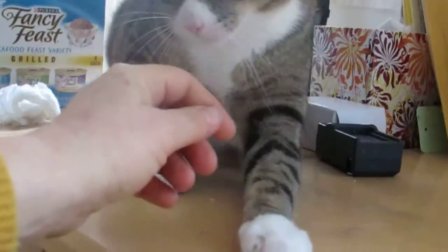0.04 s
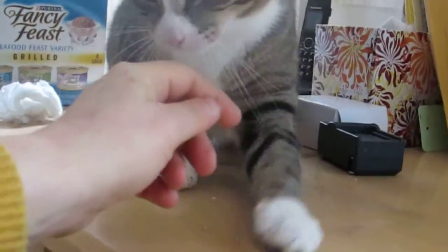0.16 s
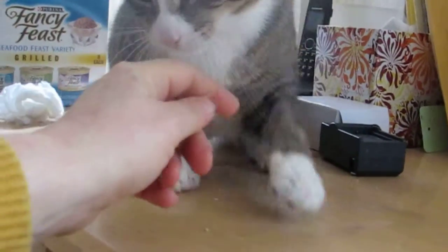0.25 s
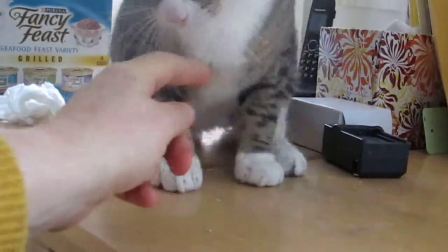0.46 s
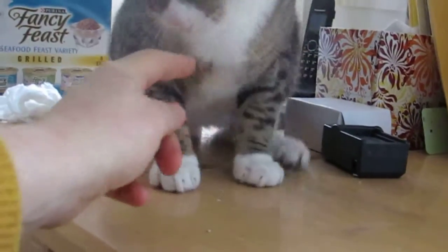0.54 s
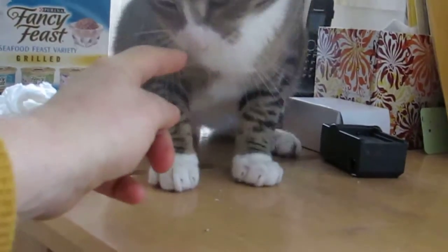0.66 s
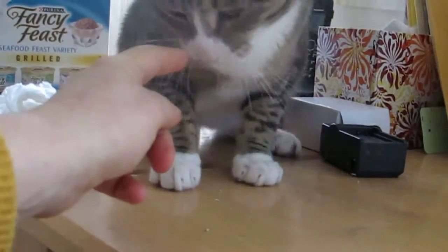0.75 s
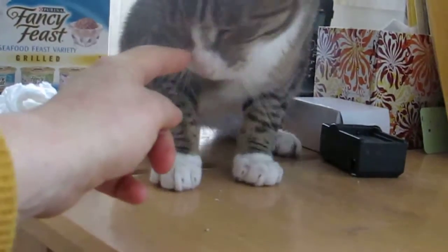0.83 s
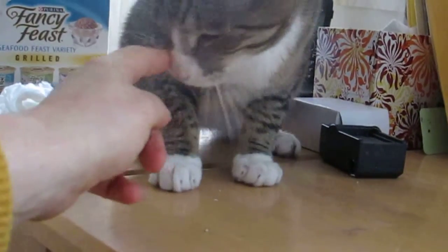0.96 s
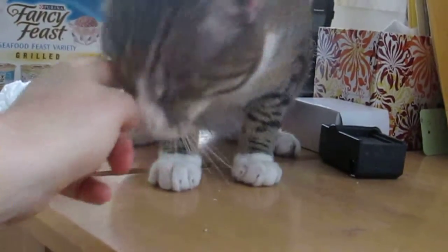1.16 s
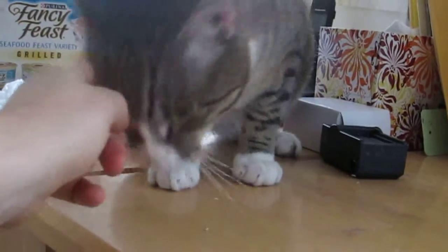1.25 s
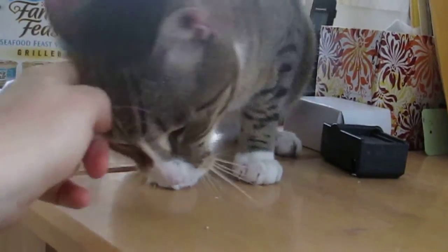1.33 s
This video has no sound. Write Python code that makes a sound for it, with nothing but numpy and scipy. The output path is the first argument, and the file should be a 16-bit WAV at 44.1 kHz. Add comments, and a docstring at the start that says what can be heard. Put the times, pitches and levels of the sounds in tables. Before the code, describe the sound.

In a quiet room, three crisp little clicks sound close by, with faint ticks just before them. Soft thuds follow, probably a cat's paw set down on a wooden table, over a steady low hiss.

```python
"""Three short, close clicks sound in a quiet room where a cat stands on a wooden table.
Each click is a few sharp snaps (heavily damped modes), a fine crackle of tiny snaps between them
and a hollow pop that falls in pitch. Two faint ticks come first. After the last click, soft thuds
(probably a paw set down) excite the table's low modes. The room adds a short reverberation,
and it hisses over a low rumble throughout."""
import sys
import numpy as np
from scipy import signal
from scipy.fft import rfft, irfft, next_fast_len
from scipy.io import wavfile

SR = 44100
rng = np.random.default_rng(int(sys.argv[2]) if len(sys.argv) > 2 else 0)


def put_to_file(sound):
    """Save the sound as 16-bit audio at rate SR, in the file named by the first command-line argument."""
    columns = np.atleast_2d(sound).T  # one column per channel
    safe = np.clip(columns, -1, 1)
    whole_steps = np.round(safe * 32767)
    wavfile.write(sys.argv[1], SR, whole_steps.astype(np.int16))


N = 61739

# The three clicks, the last in two parts. Each row: start and length in seconds,
# crackle and pop levels in dB, the pop's first and last frequency in Hz.
CLICK_PARTS = [(.2050, 0.0085, -42, -52, 670, 498), (0.3621, 0.014, -50.5, -38.5, 791, 431),
               (0.5279, 0.0107, -40, -35.5, 701, 402), (.5384, .0070, -44.5, -39.5, 645, 490)]


def amp(db):
    """Amplitude ratio of a level in decibels."""
    return 10 ** (np.asarray(db) / 20)


def unit(x):
    """Normalisation to an rms of 1."""
    return x / np.sqrt(np.mean(x ** 2) + 1e-20)


def along(points, hz):
    """Interpolation of (Hz, value) points on a logarithmic frequency axis."""
    frequencies, values = np.transpose(points)
    return np.interp(np.log(hz + 1), np.log(frequencies + 1), values)


def filtered(x, response):
    """Linear filtering: the spectrum of x is multiplied by response(hz)."""
    size = next_fast_len(N + SR // 2)
    return irfft(rfft(x, size) * response(np.fft.rfftfreq(size, 1 / SR)), size)[..., :N]


def pan(right_db):
    """Interaural level difference: left and right gains, right_db apart."""
    return amp(np.array([[-right_db], [right_db]]) / 2)


def add(out, start, sound):
    """Superposition: a sound joins the mix at start, in seconds."""
    part = out[:, max(0, round(start * SR)):][:, :sound.shape[-1]]
    part += sound[..., :part.shape[1]]


def stereo_noise(spectrum, coherence):
    """Partial coherence: the balance of independent mid and side noises sets how alike the ears are."""
    def response(hz):
        angle = np.arccos(along(coherence, hz)) / 2
        return amp(along(spectrum, hz)) * [np.cos(angle), np.sin(angle)]
    mid, side = filtered(rng.standard_normal((2, N)), response)
    return unit(np.array([mid + side, mid - side]))


def background():
    """Stationary noise: a broad, diffuse hiss lies over a largely coherent room rumble."""
    # Noise spectra. Each row: frequency in Hz, relative spectral density in dB.
    hiss_spectrum = [(120, -16.5), (200, -8.5), (268, -4), (360, -6.5), (409, -4.5), (612, -7.5),
                     (1230, -6.5), (1810, -8), (7830, -12.5), (8580, -13.5), (16000, -20)]
    rumble_spectrum = [(20, -10.5), (55, -4), (85, -10), (115, 1.5), (145, 3), (180, -10), (260, -10),
                       (400, -25), (800, -65)]
    # Likeness of the hiss at the two ears. Each row: frequency in Hz, correlation.
    hiss_coherence = [(200, 0.59), (600, 0.36), (1500, 0.18), (4000, 0.2), (12000, 0.039)]
    rumble = stereo_noise(rumble_spectrum, coherence=[(100, 0.85)]) * pan(right_db=4.5)
    hiss = stereo_noise(hiss_spectrum, hiss_coherence)
    return amp(-61) * hiss + amp(-73.5) * rumble


def snap(pitch, low_db, treble_db):
    """Impulse response: heavily damped modes interfere with their reflection from a close surface."""
    # The snap's modes. Each row: frequency in Hz, T60 in seconds, left and right levels in dB.
    modes = [(2260, 0.0024, -26, -20), (3030, 0.0021, -12, -10.5), (5160, 0.0026, -1.5, -5),
             (5650, 0.0028, -12.5, -7), (6760, 0.0043, -30, -6), (9120, 0.0024, -28, -12)]
    reflection_s, reflection_db = 0.00038, -9
    dip_hz, dip_width_hz, dip_depth = 4080, 370, 0.66
    bottom_hz, left_top_hz, right_top_hz = 1020, 7140, 11000
    t = np.arange(SR // 100) / SR
    paths = [(t, 0), (np.maximum(t - reflection_s, 0), reflection_db)]
    ring = np.zeros((2, len(t)))
    for hz, t60, left_db, right_db in modes:
        tilt_db = low_db * (hz < 4000) + treble_db * (hz > 6500)
        mode_db = np.array([[left_db], [right_db]]) + tilt_db
        for age, path_db in paths:
            ring += amp(mode_db + path_db - 60 * age / t60) * np.sin(2 * np.pi * hz * pitch * age)
    # A notch deepens the valley between the two main resonances.
    dip_band = signal.iirpeak(dip_hz * pitch, dip_hz / dip_width_hz, fs=SR)
    ring -= dip_depth * signal.lfilter(*dip_band, ring)
    for side, top_hz in enumerate([left_top_hz, right_top_hz]):
        passband = signal.butter(2, [bottom_hz, top_hz], "bandpass", fs=SR)
        ring[side] = signal.lfilter(*passband, ring[side])
    return ring


def snaps():
    """Impulsive excitation: single snaps form the faint ticks, then the sharp edges of the clicks."""
    # The snaps. Each row: start in seconds, gain in dB, pitch ratio,
    # extra gain of the low modes and of the treble modes in dB.
    impulses = [(.0300, -43, 0.73, -11, -8.5), (0.0468, -39, 0.75, -14, -9), (0.0485, -43, 0.83, 3, -6),
                (.2041, -20, 1.02, -17, 5), (.2060, -26.5, 1.06, -3, 3), (.2126, -17, 1.044, 0, -2.5),
                (0.2165, -35, 1.1, -6, -5), (0.3628, -27.5, 1.01, 5, 3), (.3762, -25.5, 0.85, 0.5, -3.5),
                (.5279, -20, 0.99, 6, 1), (0.5316, -30.5, 0.9, 11, -4), (0.5382, -19, 0.965, -0.5, -3),
                (.5448, -21, 0.89, 2, -3)]
    out = np.zeros((2, N))
    for start, db, pitch, low_db, treble_db in impulses:
        add(out, start, amp(db) * snap(pitch, low_db, treble_db))
    return out


def crackle():
    """Shot noise: a fading spray of tiny snaps at seven pitches and random times fills each click."""
    snaps_per_s, spread_db, fade_db = 5000, 2, 9.5
    pitches = np.exp(np.linspace(-0.225, 0.225, 7))
    grains = np.array([snap(pitch, low_db=6, treble_db=-2) for pitch in pitches])
    out, t = np.zeros((2, N)), np.arange(SR // 20) / SR
    shape = (len(grains), 1, len(t))
    for start, length, db, *_ in CLICK_PARTS:
        fires = (rng.random(shape) < snaps_per_s / SR / len(grains)) & (t < length)
        strength = amp(spread_db * rng.standard_normal(shape) - fade_db * t / length)
        polarity = rng.choice([-1, 1], shape)
        spray = signal.fftconvolve(fires * polarity * strength, grains, axes=2).sum(axis=0)
        duty = length * SR / spray.shape[1]  # refers the rms level to the click's length
        add(out, start, amp(db) * unit(spray) * np.sqrt(duty))
    return out


def pops():
    """Glide and free decay: a tone falls through each click and leaves a hollow resonance ringing."""
    attack_s, release_s, hold_share, octave_db = 0.00034, 0.0025, 0.852, -14
    hollow_hz, hollow_t60, hollow_db = 498.3, 0.33, -18.5
    out, t = np.zeros((2, N)), np.arange(SR // 2) / SR
    for start, length, _, db, first_hz, last_hz in CLICK_PARTS:
        progress = np.minimum(t / length, 1)
        hz = first_hz * (last_hz / first_hz) ** progress
        phase = 2 * np.pi * np.cumsum(hz) / SR
        tone = np.sin(phase) - amp(octave_db) * np.cos(2 * phase)
        attack = 1 - np.exp(-t / attack_s)
        release = np.exp(-np.maximum(t - hold_share * length, 0) / release_s)
        ring = progress * amp(hollow_db - 60 * t / hollow_t60) * np.sin(2 * np.pi * hollow_hz * t)
        add(out, start, amp(db) * (ring - attack * release * tone))
    return out * pan(right_db=3)


def thuds():
    """Modal response: a soft contact lacks high frequencies, so only the table's low modes ring."""
    # Contacts with the table. Each row: start in seconds, gain in dB.
    contacts = [(.553, -47), (.608, -56)]
    # The table's modes. Each row: frequency in Hz, relative level in dB, T60 in seconds.
    modes = [(103, -4, 0.08), (143.2, -8, 0.32), (164.3, -4, .11), (240, -6, 0.11), (314, -8, 0.11)]
    attack_s = 0.0023
    out, t = np.zeros((2, N)), np.arange(SR // 2) / SR
    for start, db in contacts:
        ring = sum(amp(mode_db - 60 * t / t60) * np.sin(2 * np.pi * (hz * t + rng.random()))
                   for hz, mode_db, t60 in modes)
        add(out, start, amp(db) * (1 - np.exp(-t / attack_s)) * ring)
    return out * pan(right_db=4.5)


def reverberation(direct):
    """Convolution with a small room's response: early scatter from nearby things, then a diffuse tail."""
    # The tail's reverberation time. Each row: frequency in Hz, T60 in seconds.
    decay_times = [(150, 0.47), (600, 0.33), (2500, 0.25), (7000, 0.25), (14000, 0.13)]
    # Colouring of all reflected sound. Each row: frequency in Hz, gain in dB.
    colour = [(150, -1), (650, -2.5), (1200, 7.5), (2500, -4), (3900, 4), (5100, -9), (6700, 3), (8500, -7),
              (15000, -3)]
    tail_delay_s, scatter_t60 = 0.005, 0.032
    hz, t, noise_bands = signal.stft(rng.standard_normal((2, SR // 2)), SR, nperseg=256)
    band_decay = amp(-60 * t / along(decay_times, hz)[:, None])
    _, tail = signal.istft(noise_bands * band_decay, SR, nperseg=256)
    age = np.arange(SR // 10) / SR
    scatter = rng.standard_normal((2, len(age))) * amp(-60 * age / scatter_t60)
    response = np.zeros((2, SR))
    add(response, tail_delay_s, amp(-13.5) * tail / np.linalg.norm(tail[0]))
    add(response, 0, amp(-13) * scatter / np.linalg.norm(scatter[0]))
    reflected = signal.fftconvolve(direct, response, axes=1)[:, :N]
    return filtered(reflected, lambda hz: amp(along(colour, hz)))


def scene():
    """Superposition of the direct sound, its reverberation and the room's steady noise."""
    direct = snaps() + crackle() + pops() + thuds()
    return direct + reverberation(direct) + background()


def record(dry):
    """Band limiting: an ideal low-pass filter removes the highest treble."""
    return filtered(dry, lambda hz: hz < 15900)


dry = scene()
out = record(dry)
put_to_file(out)
```